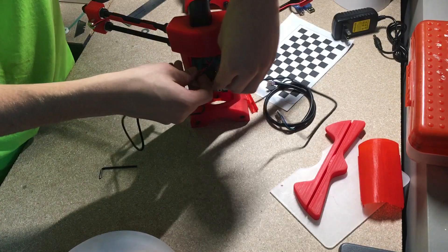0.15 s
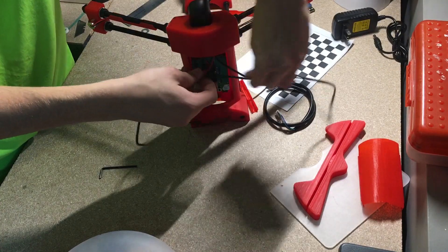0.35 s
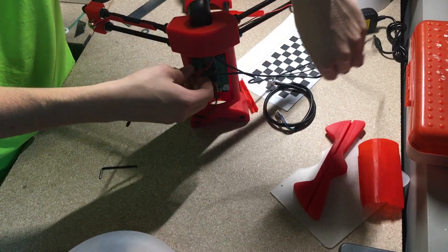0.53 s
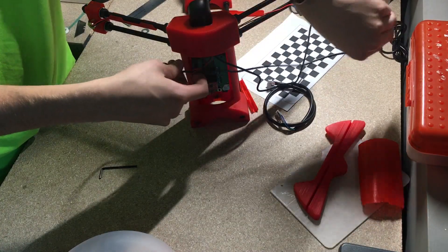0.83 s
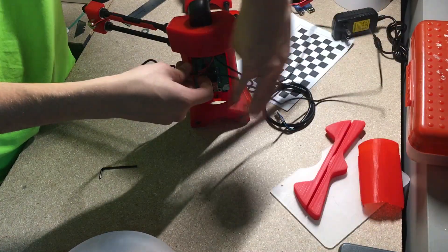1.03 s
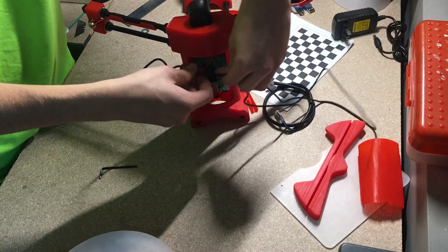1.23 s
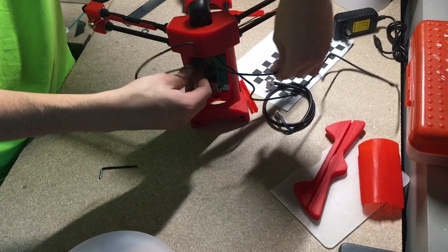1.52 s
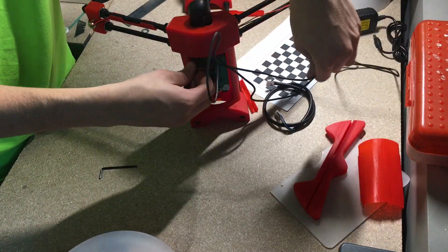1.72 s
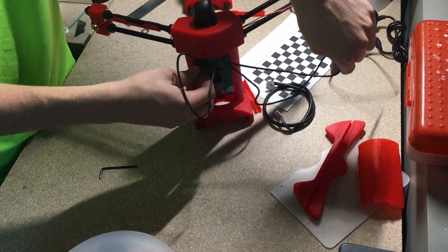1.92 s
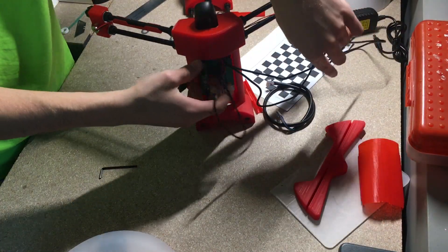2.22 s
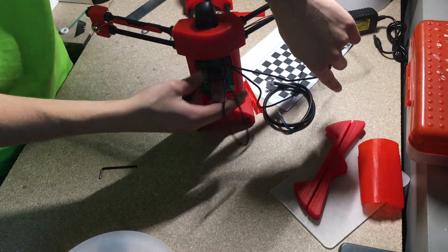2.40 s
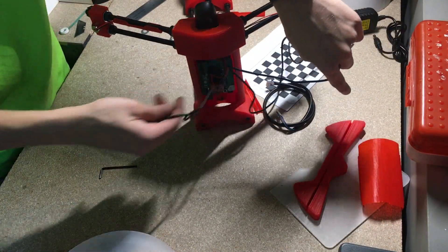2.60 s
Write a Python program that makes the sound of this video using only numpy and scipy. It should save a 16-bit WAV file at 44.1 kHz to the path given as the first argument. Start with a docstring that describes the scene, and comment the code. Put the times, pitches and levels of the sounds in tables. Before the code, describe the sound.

A cable is threaded through a hollow plastic base on a desk, close up in a small quiet room. A bright slap at 0.1 s echoes briefly; crisp hollow clicks cluster around 0.55 s. After quieter handling, a sliding hiss swells to a sharp click at 1.5 s. From 1.9 to 2.3 s the base scrapes, judders and knocks with low booms, then light rattles and a click at 2.6 s.

```python
"""A cable is threaded through the hollow plastic base of a rod frame standing on a desk, in a small room.
At first its end slaps down on the desk: bursts of dying noise over the ringing modes of the board.
Friction grains then hiss as it slides and is pulled through the opening; contacts crack and ring the shell.
Near 2 s the base is nudged: stick-slip pulses judder it over the desk, its foot scrapes and it knocks,
so that the frame booms. The close microphone clips the loudest peaks softly."""
import sys
import numpy as np
from scipy import signal
from scipy.fft import rfft, irfft, next_fast_len
from scipy.io import wavfile
from scipy.ndimage import uniform_filter1d

SR = 44100
rng = np.random.default_rng(int(sys.argv[2]) if len(sys.argv) > 2 else 0)


def generate_wav(signal):
    """Clip the signal to [-1, 1] and save it as 16-bit WAV at the path in sys.argv[1]."""
    frames = np.transpose(np.atleast_2d(signal))
    scaled = np.clip(frames, -1, 1) * 32767
    pcm = np.round(scaled).astype(np.int16)
    wavfile.write(sys.argv[1], SR, pcm)


N = 121275  # length [samples]
TAIL = 16384  # length of one struck sound [samples]
TOP_HZ = 15900  # band limit
ATTACK_S = 0.00032  # build-up time constant of a contact
ROOM_DB = -13.5  # echo of clicks, chatter and ticks


def amp(db):
    """Level law: decibels to amplitude gain."""
    return 10 ** (np.asarray(db) / 20)


def unit(x):
    """Normalisation: scale to rms 1."""
    return x / np.sqrt(np.mean(x ** 2) + 1e-20)


def along(points, hz):
    """Interpolation of (frequency [Hz], value) points on a logarithmic frequency axis."""
    f, v = np.transpose(points)
    return np.interp(np.log(hz + 1), np.log(f + 1), v)


def curve(rows, axis=1, outside=None):
    """Linear interpolation in time of one table column, per sample."""
    rows = np.array(rows)
    return np.interp(np.arange(N) / SR, rows[:, 0], rows[:, axis], outside, outside)


def level(rows, axis=1):
    """Envelope: gain from a decibel column, silent outside its span."""
    return amp(curve(rows, axis=axis, outside=-np.inf))


def filtered(x, response):
    """Linear filtering: the spectrum of x times a response of frequency."""
    m = next_fast_len(N + SR // 2)
    return irfft(rfft(x, m) * response(np.fft.rfftfreq(m, 1 / SR)), m)[:N]


def coloured(x, colour):
    """Spectral shaping by a (frequency [Hz], level [dB]) curve."""
    return filtered(x, lambda hz: amp(along(colour, hz)))


def add(track, s, sound):
    """Superposition: mix a sound in at a time in seconds."""
    part = track[round(s * SR):][:len(sound)]
    part += sound[:len(part)]


def resonator(f, hz, damping):
    """Driven damped oscillator: band-pass response with unit peak at hz."""
    return 1j * f * damping / (hz * hz - f * f + 1j * f * damping)


def ring(modes, spread_db):
    """Modal superposition: damped sines whose level and sign vary with every stroke."""
    t = np.arange(TAIL) / SR
    out = np.zeros(TAIL)
    for hz, db, t60 in modes:
        varied_db, sign = rng.standard_normal(2)
        decay = amp(db + spread_db * varied_db - 60 * t / t60)
        out += np.sign(sign) * decay * np.sin(2 * np.pi * hz * t)
    return out


def clusters(modes):
    """Modal beating: many close modes ring together as a narrow, dying noise."""
    t = np.arange(TAIL) / SR
    f = np.fft.rfftfreq(TAIL, 1 / SR)
    out = np.zeros(TAIL)
    for hz, width, db, t60 in modes:
        spectrum = rfft(rng.standard_normal(TAIL)) / (1 + (2 * (f - hz) / width) ** 2)
        tone = irfft(spectrum, TAIL)
        decay = amp(-60 * t / t60) * (1 - np.exp(-t / ATTACK_S))
        # the energy follows the decay, whatever the noise
        out += amp(db) * tone * decay * np.linalg.norm(decay) / np.linalg.norm(tone * decay)
    return out


# clusters of close modes of the plastic shell:
# (frequency [Hz], width [Hz], relative level [dB], free t60 [s])
SHELL_MODES = [(925, 244, -3.5, 0.25), (1401, 58, -0.5, 0.19), (1655, 350, 3, 0.09), (1840, 74, 2.5, 0.057),
               (2686, 33, -12, 0.061), (3320, 190, 1, 0.023), (3753, 88, -12.5, .07)]


def through_shell(x, resonance_db):
    """Resonant coloration: the shell's resonances shape a sound at constant energy."""
    resonances = np.zeros(len(x))
    for hz, width, _, _ in SHELL_MODES:
        resonances += signal.lfilter(*signal.iirpeak(hz, hz / width, fs=SR), x)
    out = x + amp(resonance_db) * resonances
    return out * np.linalg.norm(x) / np.linalg.norm(out)


# bass, middle, presence and treble bands of a contact: (lower edge [Hz], upper edge [Hz])
CONTACT_BANDS = [(120, 400), (560, 1250), (1450, 4100), (3700, 15000)]
# decay of each of these bands: (t60 over that of the contact [ratio])
BAND_DECAY_RATIOS = [2.38, 1.97, 1.3, 1.15]
TOP_ROLL_HZ, SOFT_DB_PER_OCTAVE = 8960, 15
CRACK_RESONANCE_DB = -1.5  # how much the shell colours a contact


def crack(band_dbs, t60, resonance_db=-np.inf):
    """Impact at high modal density: four bands of dying noise; a soft contact also rolls off lower."""
    t = np.arange(TAIL) / SR
    out = np.zeros(TAIL)
    *_, presence_db, treble_db = band_dbs
    softness_db = min(treble_db - presence_db, 0)
    roll_hz = min(TOP_ROLL_HZ * 2 ** (softness_db / SOFT_DB_PER_OCTAVE), TOP_HZ)
    roll_off = signal.butter(2, roll_hz, fs=SR)
    for edges, db, ratio in zip(CONTACT_BANDS, band_dbs, BAND_DECAY_RATIOS):
        decay = amp(-60 * t / (t60 * ratio)) * (1 - np.exp(-t / ATTACK_S))
        band = signal.butter(N=3, Wn=edges, btype="band", fs=SR, output="sos")
        burst = signal.sosfilt(band, rng.standard_normal(TAIL) * decay)
        burst = through_shell(signal.lfilter(*roll_off, burst), resonance_db)
        # at 0 dB: the energy of rms 1 lasting 2.7 ms
        out += amp(db) * burst / np.sqrt(np.sum(burst ** 2) / (0.0027 * SR))
    return out


# reverberation of the small room: (frequency [Hz], t60 [s])
ROOM_DECAY = [(150, 0.43), (800, 0.49), (2000, 0.4), (5500, .35), (10000, 0.31), (15000, 0.2)]
ROOM_DELAY_S, ROOM_DULL_HZ = 0.005, 8500


def echo(x):
    """Diffuse reverberation: convolution with delayed noise that is duller and decays by frequency."""
    hz, t, z = signal.stft(rng.standard_normal(TAIL), SR, nperseg=256)
    dulling = 1 + (hz[:, None] / ROOM_DULL_HZ) ** 2
    decay = amp(-60 * t / along(ROOM_DECAY, hz)[:, None]) / dulling
    tail = signal.istft(z * decay, SR, nperseg=256)[1]
    tail = np.pad(tail / np.linalg.norm(tail), (round(ROOM_DELAY_S * SR), 0))
    return signal.fftconvolve(x, tail)[:len(x)]


def in_room(x, room_db):
    """Superposition of direct sound and echo."""
    return x + amp(room_db) * echo(x)


GRAINS_PER_S = 6500


def friction(colour, patchy_db, spread_db):
    """Granular friction: dense tiny catches of uneven size, bunched in time and pitch; rms 1."""
    chance, (sign, size) = rng.random(N), rng.standard_normal((2, N))
    grains = (chance < GRAINS_PER_S / SR) * sign * amp(spread_db * size)
    z = signal.stft(grains, nperseg=256)[2]
    patches = uniform_filter1d(rng.standard_normal(z.shape), size=6, axis=0)
    patches = uniform_filter1d(patches, size=4, axis=1)
    grains = signal.istft(z * amp(patchy_db * unit(patches)), nperseg=256)[1][:N]
    return unit(coloured(grains, colour))


# spectrum of the quiet room: (frequency [Hz], relative level [dB])
FLOOR_COLOUR = [(15, -52), (25, -15), (41, -11), (64, 3), (102, -18), (149, -5), (236, -28.5), (641, -24.5),
                (15000, -42.5)]


def room_floor():
    """Stationary noise: the steady background of the quiet room."""
    return amp(-43) * unit(coloured(rng.standard_normal(N), FLOOR_COLOUR))


# hand pressure shaking the frame: (time [s], level [dB])
SHAKE_LEVEL = [(0, -34.5), (.33, -58), (.5, -41), (.68, -48), (1.05, -50), (1.12, -30.5), (1.25, -49),
               (1.42, -34), (1.495, -33), (1.55, -57), (1.66, -38), (1.76, -41.5), (1.91, -35),
               (2.06, -12.5), (2.15, -45.5), (2.27, -16.5), (2.35, -42.5), (2.65, -44), (2.75, -32.5)]
# low modes of frame and desk: (frequency [Hz], width [Hz], relative level [dB])
SWAY_MODES = [(72.4, 4.6, -2.5), (143.7, 6.5, -1.5), (193.4, 7.8, 3), (286, 147, -14), (373, 34, -14),
              (452.5, 6.4, -19.5)]


def shake():
    """Forced vibration: handling noise keeps the low modes of frame and desk rumbling."""
    def body(f):
        modes = sum((-1) ** k * amp(db) * resonator(f, hz, width)
                    for k, (hz, width, db) in enumerate(SWAY_MODES))
        return modes / (1 + (f / 700) ** 2)
    return unit(filtered(rng.standard_normal(N), body)) * level(SHAKE_LEVEL)


# soft shoves of the rods: (time [s], mode frequency [Hz], level [dB], t60 [s])
ROD_SHOVES = [(1.081, 149, -15.5, 0.2), (2.025, 69.35, -16.5, 1), (2.233, 187.6, -19, 0.24)]
SWING_RISE_S = 0.016


def swing():
    """Free damped vibration: after a shove one low mode of the rods builds up and slowly dies."""
    out, t = np.zeros(N), np.arange(SR) / SR
    for s, hz, db, t60 in ROD_SHOVES:
        envelope = amp(db - 60 * t / t60) * (1 - np.exp(-t / SWING_RISE_S))
        add(out, s, envelope * np.sin(2 * np.pi * hz * t))
    return out


# light touches of loose parts on the shell: (time [s], level [dB])
LIGHT_TOUCHES = [(.573, -28.5), (.587, -32), (1.121, -40), (1.562, -35), (1.875, -40), (2.198, -40),
                 (2.27, -36), (2.42, -31.5), (2.439, -28), (2.452, -29.5), (2.464, -39)]
CHATTER_DAMPING = 0.5  # share of the shell's free ring time


def chatter():
    """Damped modal ringing: loose parts touch lightly and ring the shell without a crack."""
    out = np.zeros(N)
    damped = [(hz, width, db, t60 * CHATTER_DAMPING) for hz, width, db, t60 in SHELL_MODES]
    for s, db in LIGHT_TOUCHES:
        add(out, s, amp(db) * clusters(damped))
    return in_room(out, ROOM_DB)


# the foot of the base scraping: (time [s], level [dB])
SCRAPE_LEVEL = [(1.85, -42.5), (1.93, -39), (1.96, -29), (2.03, -26), (2.07, -38), (2.1, -48), (2.16, -37),
                (2.205, -32.5), (2.27, -32.5), (2.33, -56), (2.4, -39), (2.45, -34.5), (2.51, -36.5),
                (2.6, -81)]
# spectrum of the scrape: (frequency [Hz], relative level [dB])
SCRAPE_SPECTRUM = [(150, 10), (400, -2), (750, -2), (1500, 1), (3000, -9), (6000, -8.5), (9500, -12),
                   (15000, -20.5)]
SLIP_DEPTH = 0.2  # how strongly the scrape pulses at the slip rate


def foot_scrape():
    """Modulated friction: the foot scrapes on the desk, pulsing at the slip rate."""
    slip_phase = 2 * np.pi * np.cumsum(curve(BASE_JUDDER)) / SR
    slipping = 1 + SLIP_DEPTH * np.cos(slip_phase)
    grains = friction(SCRAPE_SPECTRUM, patchy_db=4.5, spread_db=3.5)
    return grains * level(SCRAPE_LEVEL) * unit(slipping)


# modes of the frame on the desk: (frequency [Hz], relative level [dB], t60 [s])
FRAME_MODES = [(69.7, -32, 0.64), (148.1, -6, 0.37), (185, 1.5, 0.23), (229, 4.5, 0.15),
               (301.6, -5.5, 0.13), (366.4, -9, 0.11), (463.3, -6, 0.24), (607, -14, 0.17),
               (1008, -15, 0.12)]
# the base sliding on the desk: (time [s], slip rate [1/s], level [dB])
BASE_JUDDER = [(1.86, 205, -61), (1.90, 214, -26), (1.935, 265, -38), (1.965, 239, -18.5),
               (1.985, 224, -11), (2.003, 215, -12.5), (2.013, 240, -19), (2.035, 230, -25),
               (2.08, 178, -21.5), (2.11, 140, -35), (2.165, 220, -41), (2.205, 199, -24.5),
               (2.225, 193, -32), (2.245, 225, -13.5), (2.30, 220, -26), (2.34, 230, -58),
               (2.405, 260, -68), (2.432, 239, -20), (2.46, 170, -24.5), (2.52, 260, -57)]
SLIP_SCATTER, SLIP_SIZE_DB = 0.03, 4.5  # timing spread [slip periods], size spread [dB]
SLIP_SOFT_HZ = 450  # softness of each push


def judder():
    """Stick-slip excitation: the foot sticks and slips, and every slip pushes the frame modes."""
    rate = curve(BASE_JUDDER)
    at = np.flatnonzero(np.diff(np.floor(np.cumsum(rate) / SR)))
    late, size = rng.standard_normal((len(at), 2)).T
    at = np.clip(at + SLIP_SCATTER * late * SR / rate[at], 0, N - 1).astype(int)
    slips = np.bincount(at, amp(SLIP_SIZE_DB * size), N)

    def body(f):
        modes = sum((-1) ** k * amp(db) * resonator(f, hz, 2 * np.pi / t60)
                    for k, (hz, db, t60) in enumerate(FRAME_MODES))
        return modes / (1 + 1j * f / SLIP_SOFT_HZ)
    boom = filtered(slips, body)
    # evened out over about 20 ms, so that the table sets the level
    own_level = np.sqrt(np.abs(uniform_filter1d(boom ** 2, size=900)) + 1e-12)
    return boom / own_level * level(BASE_JUDDER, axis=2)


# the base knocking on the desk; bass and frame offsets are applied below:
# (time [s], thump [dB], middle [dB], presence [dB], treble [dB], contact t60 [s])
BASE_KNOCKS = [(1.943, -21, -27, -21.5, -21.5, 0.058), (2.109, -23, -23, -26.5, -36, 0.026),
               (2.229, -16, -14.5, -12.5, -14, 0.039), (2.411, -24, -26, -19, -27.5, 0.016),
               (2.429, -22.5, -33, -23.5, -26, 0.02)]
KNOCK_BASS_DB, KNOCK_FRAME_DB = -15, -3.5  # crack bass and frame modes over the thump column
KNOCK_SHELL_DB = -9  # shell ring over the presence column


def knocks():
    """Impact excitation: the base rocks on the desk, the frame thumps and the shell rings."""
    out = np.zeros(N)
    for s, thump_db, middle_db, presence_db, treble_db, t60 in BASE_KNOCKS:
        bands = [thump_db + KNOCK_BASS_DB, middle_db, presence_db, treble_db]
        contact = crack(bands, t60, CRACK_RESONANCE_DB)
        frame = amp(thump_db + KNOCK_FRAME_DB) * ring(FRAME_MODES, spread_db=5.5)
        shell = amp(presence_db + KNOCK_SHELL_DB) * clusters(SHELL_MODES)
        add(out, s, in_room(contact + frame + shell, room_db=-15.0))
    return out


# tiny snags of the cable: (time [s], level before spectral shaping [dB])
CABLE_TICKS = [(1.352, -33.5), (1.48, -33), (1.756, -38.5), (1.84, -36)]
# spectrum of the cable on the edge of the opening: (frequency [Hz], relative level [dB])
EDGE_SPECTRUM = [(2000, -37), (5000, 1.5), (8000, 2.5), (11500, 1.5), (14000, -3.5)]
TICK_T60_S = 0.038


def ticks():
    """Transient friction: the cable snags for an instant on the edge, a short dying noise."""
    out, t = np.zeros(N), np.arange(TAIL) / SR
    for s, db in CABLE_TICKS:
        add(out, s, amp(db - 60 * t / TICK_T60_S) * rng.standard_normal(TAIL))
    return in_room(coloured(out, EDGE_SPECTRUM), ROOM_DB)


# fast pulls of the taut cable: (peak time [s], rise [s], fall [s], level [dB])
FAST_PULLS = [(.495, 0.064, 0.11, -39), (1.45, 0.026, 0.054, -38), (1.64, 0.05, 0.037, -41.5)]


def pull_level():
    """Gaussian envelopes: the gain swells and fades with each fast pull."""
    t = np.arange(N) / SR
    return sum(amp(db) * np.exp(-((t - s) / np.where(t < s, rise, fall)) ** 2)
               for s, rise, fall, db in FAST_PULLS)


# the cable sliding through the opening: (time [s], level [dB])
SLIDE_LEVEL = [(0, -46), (.33, -48.5), (.48, -54), (.53, -48), (.6, -43), (.72, -54), (1.02, -61),
               (1.15, -46.5), (1.27, -48), (1.38, -38.5), (1.445, -33.5), (1.5, -36.5), (1.58, -51.5),
               (1.64, -41.5), (1.72, -52.5), (2.58, -53.5), (2.7, -44), (2.75, -39.5)]
# spectrum of the slide: (frequency [Hz], relative level [dB])
SLIDE_SPECTRUM = [(300, 8), (1000, 5), (1800, 8.5), (3500, 4), (5500, -1), (9000, -2), (14000, -11.5)]


def cable_hiss(pulling):
    """Sliding friction: the cable hisses through the opening and whispers over its edge when pulled fast."""
    slide = friction(SLIDE_SPECTRUM, patchy_db=3, spread_db=3.0) * level(SLIDE_LEVEL)
    whisper = friction(EDGE_SPECTRUM, patchy_db=2.5, spread_db=4.5) * pulling
    return slide + whisper


CATCHES_PER_S, RASP_DB = 400, -7  # coarse catches; their level over the whisper


def cable_rasp(pulling):
    """Random impulse excitation: coarse catches of the pulled cable ring through the shell."""
    catches = (rng.random(N) < CATCHES_PER_S / SR) * rng.standard_normal(N)
    return amp(RASP_DB) * unit(through_shell(catches, resonance_db=20)) * pulling


# modes of the desk board: (frequency [Hz], width [Hz], relative level [dB], t60 [s])
DESK_MODES = [(232, 380, -1.5, 0.3), (743, 190, 1, 0.15), (1320, 950, 1, 0.21)]
SLAP_S, SLAP_T60_S = 0.1104, 0.03  # time, contact decay
SLAP_BANDS_DB = [-31, -21.5, -12, -4.5]  # bass, middle, presence, treble
SLAP_ROOM_DB, DESK_DB = -7.5, -24.5


def slap(count=5):
    """Impact: the cable end slaps the desk, rings the board and leaves a smooth, diffuse echo."""
    out = np.zeros(N)
    direct = crack(SLAP_BANDS_DB, SLAP_T60_S)
    # echoes of independent cracks add up to a smoother spectrum
    diffuse = sum(echo(crack(SLAP_BANDS_DB, SLAP_T60_S)) for _ in range(count)) / np.sqrt(count)
    board = amp(DESK_DB) * clusters(DESK_MODES)
    add(out, SLAP_S, direct + amp(SLAP_ROOM_DB) * diffuse + board)
    return out


# cable and fingers clicking on the base; the ring column is offset below:
# (time [s], bass [dB], middle [dB], presence [dB], treble [dB], contact t60 [s], shell ring [dB])
BASE_CLICKS = [(.038, -18, -21, -27.5, -35.5, 0.017, -33), (.410, -33, -30, -31, -31.5, 0.068, -33),
               (.539, -27, -36, -5.5, -8.5, 0.02, -17.5), (.546, -22, -48, -11.5, -26, 0.046, -24),
               (0.555, -17.5, -16, -18.5, -21.5, 0.025, -19), (.607, -30, -30, -22, -22, 0.01, -35),
               (.685, -32.5, -45, -15.5, -18.5, 0.028, -27), (1.081, -20, -29, -24.5, -21, 0.016, -37),
               (1.219, -27.5, -30.5, -39, -50, 0.068, -49), (1.294, -24.5, -32, -21, -31.5, 0.057, -35),
               (1.323, -29, -52, -24.5, -33.5, 0.046, -44), (1.5024, -28.5, -43, -7.5, -8.5, 0.018, -37),
               (1.888, -52, -50, -60, -20.5, 0.027, -36), (2.475, -35, -32, -18.5, -24, 0.035, -53),
               (2.504, -51, -55, -27.5, -18, 0.021, -56), (2.631, -24, -26.5, -9, -15.5, 0.035, -43),
               (2.743, -30, -61, -50, -27, 0.084, -49)]
CLICK_RING_DB = -7.0  # added to the ring column


def clicks():
    """Impact excitation: each contact cracks and rings the shell."""
    out = np.zeros(N)
    for s, *bands, t60, ring_db in BASE_CLICKS:
        contact = crack(bands, t60, CRACK_RESONANCE_DB)
        shell = amp(ring_db + CLICK_RING_DB) * clusters(SHELL_MODES)
        add(out, s, in_room(contact + shell, ROOM_DB))
    return out


def scene():
    """Superposition of all sources over the quiet room."""
    pulling = pull_level()
    rubbing = in_room(foot_scrape() + cable_hiss(pulling) + cable_rasp(pulling), room_db=-7.5)
    background = room_floor() + shake() + swing() + chatter()
    base = judder() + knocks()
    cable = ticks() + slap() + clicks()
    return (background + base + rubbing + cable)[None]


def record(dry):
    """Saturation and band limiting: the loudest peaks clip softly, nothing is kept above the limit."""
    clipped = dry[0] / (1 + dry[0] ** 4) ** .25
    return filtered(clipped, lambda hz: hz < TOP_HZ)[None]


dry = scene()
out = record(dry)
generate_wav(out)
```